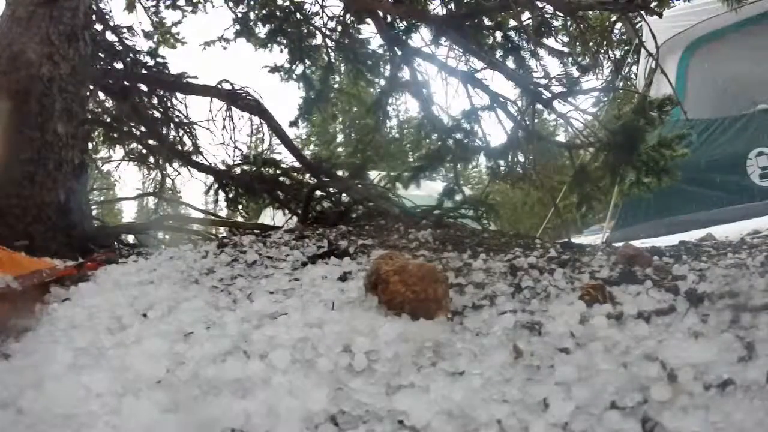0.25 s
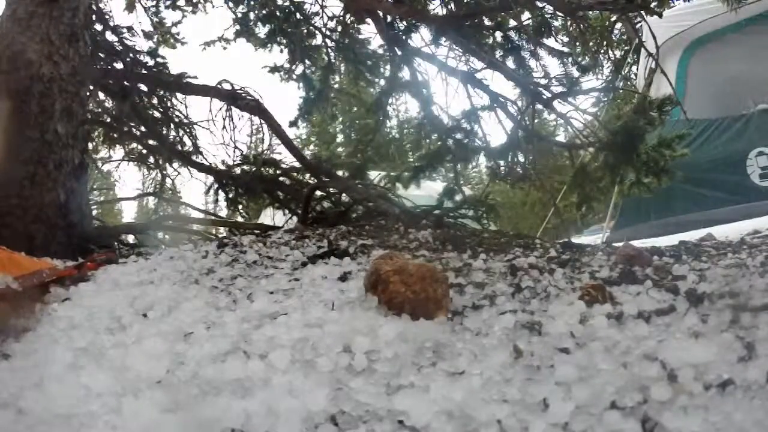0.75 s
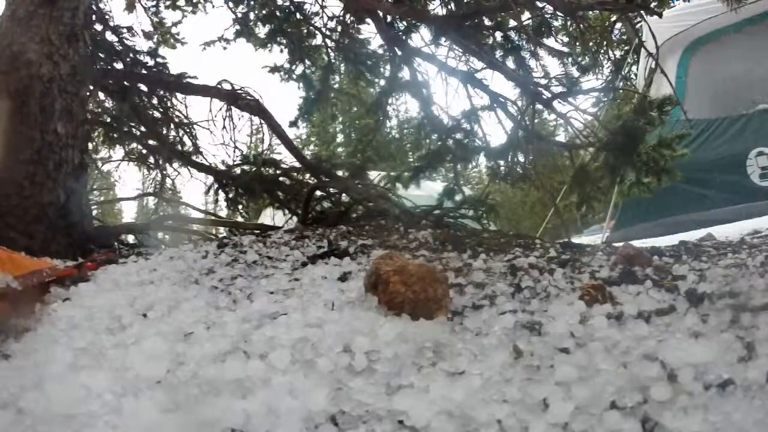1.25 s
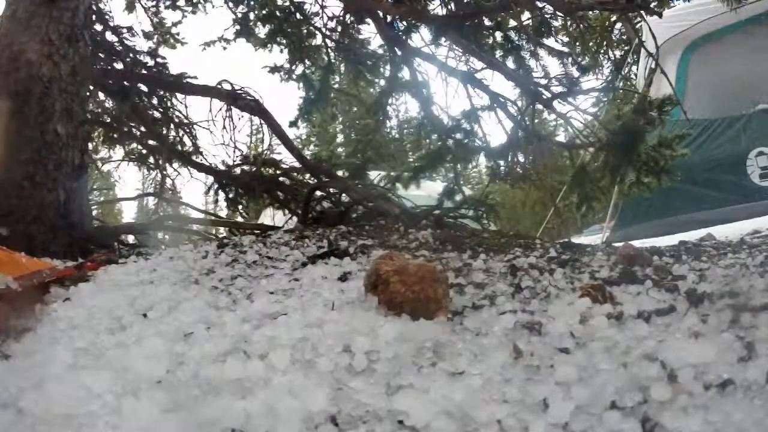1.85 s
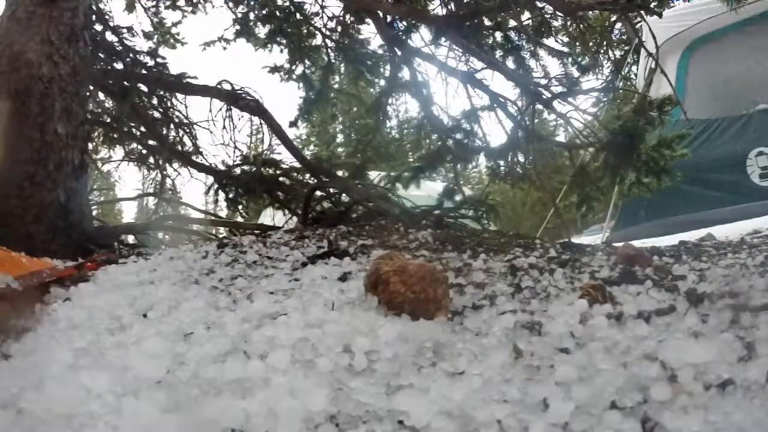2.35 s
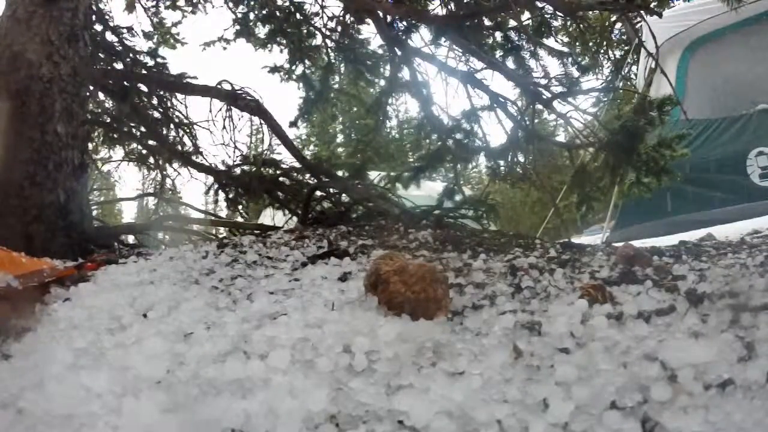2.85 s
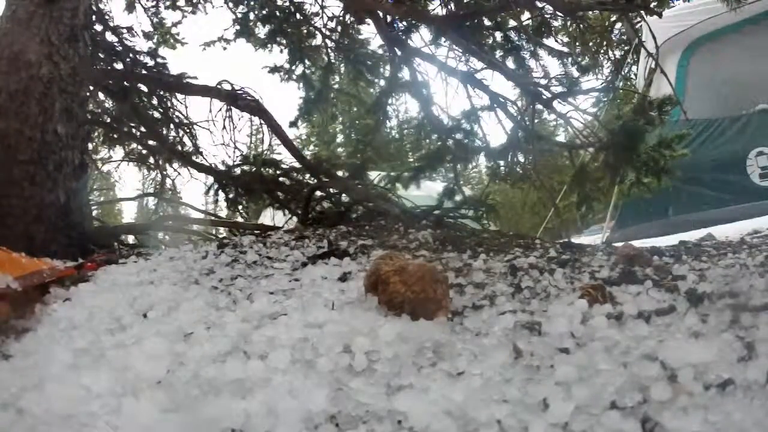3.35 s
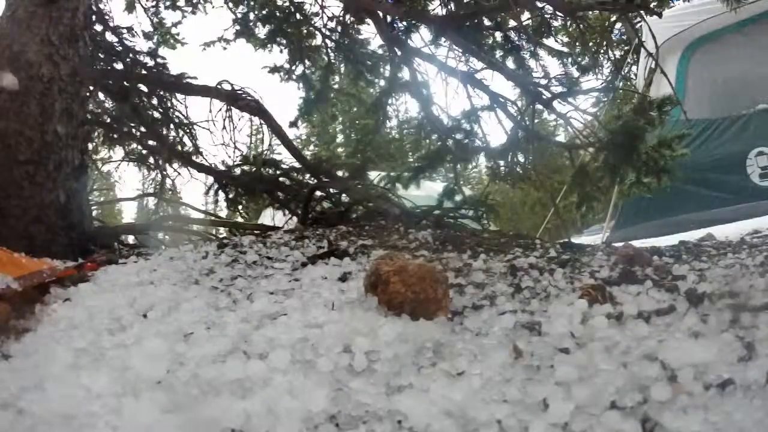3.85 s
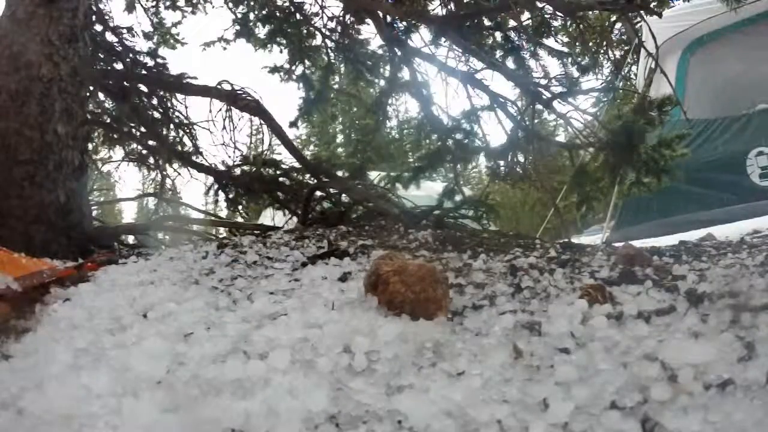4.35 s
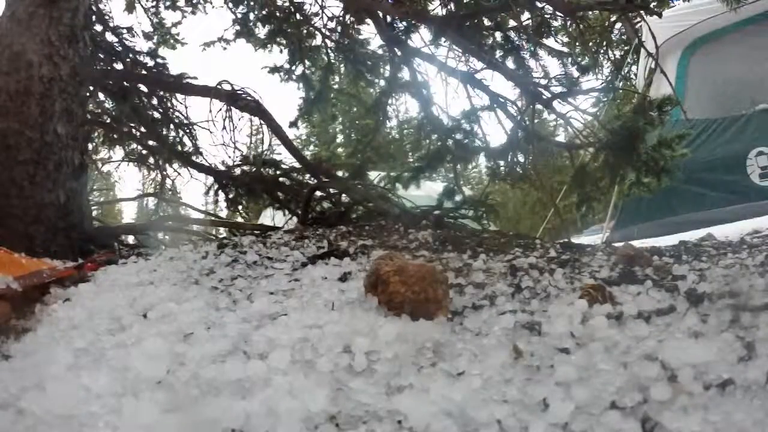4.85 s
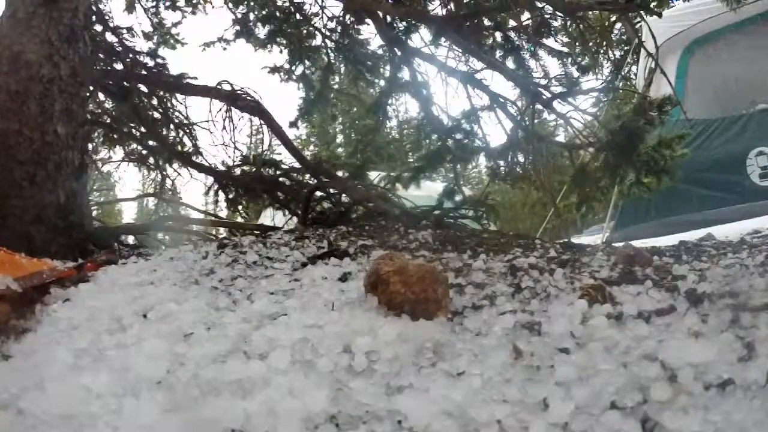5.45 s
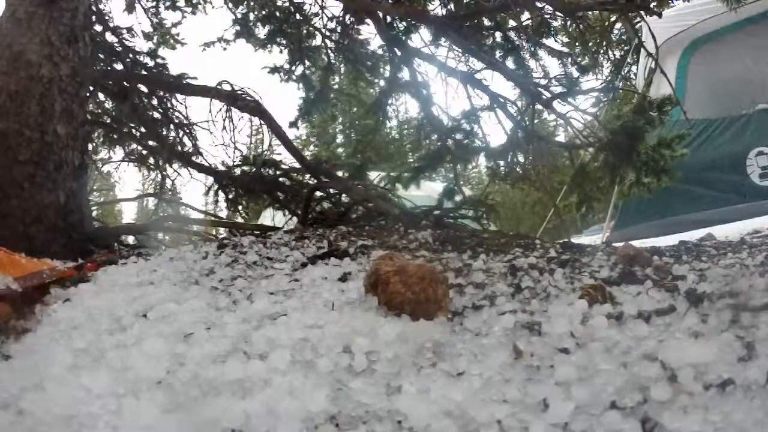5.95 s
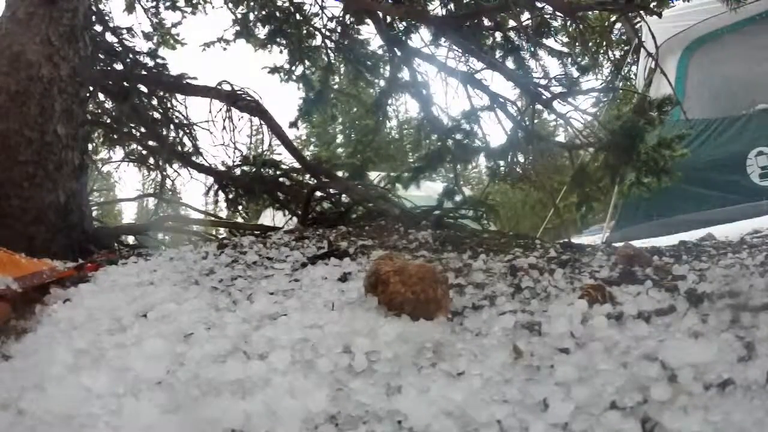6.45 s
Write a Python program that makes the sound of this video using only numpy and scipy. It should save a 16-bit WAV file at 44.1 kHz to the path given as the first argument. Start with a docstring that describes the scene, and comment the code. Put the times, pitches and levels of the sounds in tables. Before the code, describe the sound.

Hail patters steadily on a bed of hailstones outdoors, with sharp clicks and hard knocks of stones landing close by and muffled thumps on taut fabric.

```python
"""Under a spruce, next to a tent: hail falls on a carpet of hailstones; a cased camera lies on the ground.
Far stones merge into filtered noise, stones around patter as noise grains, single ones crack and settle
as filtered blows, ice chips tick, and some stones thump on taut fabric as sines of falling pitch.
The case colours wash, patter and single stones; the hardest blows make the gain control duck."""
import sys
import numpy as np
from scipy import signal
from scipy.io import wavfile
from scipy.ndimage import uniform_filter1d, minimum_filter1d

SR = 44100
rng = np.random.default_rng(int(sys.argv[2]) if len(sys.argv) > 2 else 0)


def wrap_up_sound(samples):
    """Save the sound to the file named by the first command line argument, as 16-bit audio."""
    columns = np.atleast_2d(samples).T
    # keep every value between -1 and 1, then stretch to whole-number steps
    tamed = np.clip(columns, -1, 1)
    steps = np.round(tamed * 32767).astype(np.int16)
    wavfile.write(sys.argv[1], SR, steps)


N = 295470
TIME_S = np.arange(N) / SR
WASH_RMS_DB, PATTER_RMS_DB = -55.5, -58   # ahead of the case


def from_db(db):
    """Decibels to gain."""
    return 10 ** (np.asarray(db) / 20)


def rms_one(x):
    """Scale to rms 1."""
    return x / np.sqrt(np.mean(x ** 2) + 1e-20)


def at_hz(points, hz):
    """Read a spectrum on a log-frequency axis."""
    points_hz, points_db = np.array(points).T
    return np.interp(np.log(hz), np.log(points_hz), points_db)


def band(x, low_hz, high_hz, order=2):
    """Causal band-pass."""
    edges_hz = [min(low_hz, .4 * SR), min(high_hz, .45 * SR)]
    sos = signal.butter(order, edges_hz, "band", fs=SR, output="sos")
    return signal.sosfilt(sos, x + 1e-18)


def add(track, start_s, sound):
    """Mix a short sound in at its start time."""
    at = max(0, round(start_s * SR))
    track[at:at + len(sound)] += sound[:max(0, N - at)]


def impacts(per_s, spread_db, largest):
    """Clicks of either sign at random moments: many small, few large, capped at spread_db * largest."""
    when, size, sign = rng.random((int(per_s * N / SR), 3)).T
    heights_db = spread_db * np.minimum(-np.log(1 - size), largest)
    heights = from_db(heights_db) * np.sign(sign - .5)
    return np.bincount((when * N).astype(int), heights, minlength=N)


def resonate(x, hz, width_hz, lift_db):
    """One resonance on top of the direct sound."""
    hz = min(hz, .4 * SR)
    b, a = signal.iirpeak(hz, hz / width_hz, fs=SR)
    return x + (from_db(lift_db) - 1) * signal.lfilter(b, a, x + 1e-18)


def case(x):
    """The camera case lifts a few resonances that ring briefly."""
    # resonances of the case: centre_hz, width_hz, lift_db
    resonances = [(1513, 227, 10), (2284, 316, 4), (2986, 1540, 6), (4560, 210, 1.5), (5440, 1220, 6),
                  (9660, 800, 4)]
    for hz, width_hz, lift_db in resonances:
        x = resonate(x, hz, width_hz, lift_db)
    return x


def far_wash(grain=.35):
    """Far stones merge into a hiss with a slight grain: noise plus clicks, shaped in half octaves."""
    # spectrum of the wash: pitch_hz, relative_level_db_per_hz
    spectrum = [(25, 2), (70, 6), (190, 5), (450, -1), (1100, -12.5), (1600, -12.5), (2300, -7),
                (3500, -28), (5300, -4.5), (6800, -35), (12000, -25.5), (16000, -97)]
    edges_hz = 20 * 2 ** np.arange(0, 10.1, .5)
    rain = []
    for _ in range(2):
        clicks = rms_one(impacts(1400, 4.3, largest=1.8))
        rain.append(rng.standard_normal(N) + grain * clicks)
    out = 0
    for k, (low_hz, high_hz) in enumerate(zip(edges_hz, edges_hz[1:])):
        gain = from_db(at_hz(spectrum, np.sqrt(low_hz * high_hz)))
        out = out + gain * band(rain[k % 2], low_hz, high_hz)   # neighbours use separate rain
    return rms_one(out)


def patter(per_s=1250, spread_db=4.5, crunch_s=0.001, pitches=26):
    """Stones all around: each a short crunch in loose ice, a decaying noise grain at one of many pitches."""
    # spectrum of the patter: pitch_hz, relative_grain_level_db
    spectrum = [(200, 3), (450, 8), (1000, 9), (1600, 5.5), (2300, 4), (3400, -12), (5300, 1.5),
                (7200, -12), (10000, -9), (13000, -27)]
    out, t = 0, TIME_S[:512]
    for hz in np.geomspace(200, 13000, num=pitches):
        crunch = rng.standard_normal(len(t)) * np.exp(-t / crunch_s)
        grain = rms_one(band(crunch, hz / 2.12, hz * 1.504))
        hits = impacts(per_s / pitches, spread_db, largest=2.6)
        out = out + from_db(at_hz(spectrum, hz)) * signal.oaconvolve(hits, grain)[:N]
    return rms_one(out)


def stone(level_db, knock_hz, ring_hz, crack_db, thud_db, crunch=0.11, crunch_s=0.0021, splinter=0.1,
          touches_per_s=900, scatter=0.015, scatter_s=0.0093, knock_width_hz=1200, ring_db=9):
    """A blow, a brief crunch of ice, then loose pellets settling; the struck spot rings at its own pitch."""
    t = TIME_S[:1536]
    blow, decay = t == 0, np.exp(-t / crunch_s)
    grit = rng.standard_normal((3, len(t)))
    touches = grit[2] * (rng.random(len(t)) < touches_per_s / SR)   # uneven after-touches
    settling = scatter * rms_one(touches) * np.exp(-t / scatter_s)
    force = rms_one(blow + crunch * grit[0] * decay + settling)
    fracture = rms_one(blow + splinter * grit[1] * decay + .5 * settling)

    knock = band(force, knock_hz, knock_hz + knock_width_hz)
    crack = from_db(crack_db) * band(fracture, 2500, 6570, order=1)
    thud = from_db(thud_db) * band(force, 100, 570, order=1)
    hit = case(resonate(knock + crack - thud, ring_hz, ring_hz / 5, ring_db))
    return from_db(level_db) * hit / np.sqrt(np.sum(hit ** 2) / (.003 * SR))   # energy spread over 3 ms


def spot_hz(chance, low_hz=1500, high_hz=6500):
    """The ring of a struck spot for a draw between 0 and 1, mostly low."""
    return low_hz * (high_hz / low_hz) ** (chance ** 2)


def stray_stones(count=140, faint_db=-44.5, range_db=12, lowest_hz=830, crack_db=-26,
                 crack_range_db=22, crunch=0.24):
    """Stones a few steps away sink into the loose ice with soft, mostly dull taps."""
    out = np.zeros(N)
    for when, size, pitch, spot, hard in rng.random((count, 5)):
        level_db = faint_db + range_db * size ** 3
        knock_hz = lowest_hz * 2 ** pitch
        hardness_db = crack_db + crack_range_db * hard ** 2
        tap = stone(level_db, knock_hz, spot_hz(spot), hardness_db, thud_db=-3, crunch=crunch)
        add(out, when * N / SR, tap)
    return out


def ice_chips(count=55, faint_db=-62, range_db=14, low_hz=4500, high_hz=14500, width=1.12,
              decay_s=0.00061):
    """Splinters of ice skip past the microphone: tiny dry noise ticks, each at its own high pitch."""
    out, t = np.zeros(N), TIME_S[:512]
    for when, size, pitch in rng.random((count, 3)):
        hz = low_hz * (high_hz / low_hz) ** pitch
        burst = rng.standard_normal(len(t)) * np.exp(-t / decay_s)
        tick = rms_one(band(burst, hz / width, hz * width, order=1))
        add(out, when * N / SR, from_db(faint_db + range_db * size ** 3) * tick)
    return out


def fabric_thumps(count=12, faint_db=-41.5, range_db=4.5, fabric_hz=165, decay_s=0.0027, rise_s=0.003,
                  sag=1.0, sag_s=0.0027, slap=0.41, slap_s=0.0029):
    """The surface is stretched and lets go: a short swing of falling pitch with a small slap."""
    # heavy stones on tent fabric (higher) and soft ground (lower): start_s, swing_peak_db, settled_pitch_hz
    thumps = list([(0.090, -33, 159), (1.668, -36.5, 145), (2.380, -29.5, 162), (2.490, -39, 145),
                   (2.685, -31, 155), (2.961, -28.5, 78.5), (3.465, -30.5, 147), (3.522, -31, 149),
                   (3.662, -25.5, 157), (5.111, -29.5, 155), (6.483, -26.5, 150), (6.588, -28, 73.6)])
    for when, size, pitch in rng.random((count, 3)):   # lighter stones on the tent, at random
        hz = fabric_hz * 2 ** ((pitch - .5) / 2)
        thumps.append((when * N / SR, faint_db + range_db * size, hz))

    out, t = np.zeros(N), TIME_S[:2048]
    for start_s, peak_db, hz in thumps:
        falling_hz = hz * (1 + sag * np.exp(-t / sag_s))
        phase = 2 * np.pi * np.cumsum(falling_hz) / SR
        swing = np.sin(phase) * (1 - np.exp(-t / rise_s)) * np.exp(-t / decay_s)
        touch = rms_one(band(rng.standard_normal(len(t)), 600, 1250)) * np.exp(-t / slap_s)
        add(out, start_s, from_db(peak_db) * (swing / np.abs(swing).max() + slap * touch))
    return out


def near_stones():
    """The stones that land close by, each a blow with its own knock, ring, crack and thud."""
    # blows: start_s, level_over_3_ms_db, knock_low_edge_hz, spot_ring_hz, icy_crack_db, ground_thud_db
    blows = [(0.0266, -26.5, 1700, 6840, -6, -33.0), (0.0571, -20.5, 1920, 2360, 6.5, -1),
             (0.0597, -22, 1790.0, 1800, -2, 2), (0.3046, -30, 1880, 2920, -17, 13),
             (0.35, -36, 2630.0, 10700.0, 4, 6.0), (0.4157, -28.5, 2010, 8800, -11, -16),
             (0.5918, -1, 806, 2850, -15, -19), (0.684, -32.5, 820.0, 3880, -8, -13.0),
             (0.7105, -29, 1740.0, 12700.0, 1, 4), (0.7655, -16.0, 2520.0, 6760, -3.5, -37),
             (0.808, -34.5, 1580, 4900.0, 9.0, -23.0), (0.8798, -10, 1410.0, 6400, -12.5, -30.0),
             (0.926, -26.5, 1810, 1110, -9, -4), (0.9396, -17.5, 4120, 13200, -3.5, -32),
             (0.9446, -10.5, 1890, 1840, -7.5, -5), (0.977, -29, 1220, 3300.0, -2, -25.0),
             (1.2994, -36.5, 1540, 4900.0, -43, -4), (1.4187, -39, 2000, 10760, -5, 0),
             (1.6948, -29, 1750, 4750, -12, -1.5), (1.919, -21.5, 1020, 1870, -23, -8.0),
             (2.0388, -31, 940, 4900.0, 0.5, -23.0), (2.119, -33.5, 1620.0, 7000.0, -13, -5.0),
             (2.1696, -17, 1510, 2830, -21, -42), (2.4939, -20.5, 1330.0, 2110, -36.0, -0.5),
             (2.5328, -9, 1160, 3100.0, -6, -13.5), (2.6718, -14.0, 2000, 1390, -13.0, -17.5),
             (2.8526, -15.0, 970, 720, -18, -12), (2.8592, -17.0, 2310, 1390, -13.5, -6),
             (2.9548, -36, 900, 1640, -16, -26), (2.9588, -17.5, 1020, 2920, -14, -21),
             (2.962, -20.5, 1500, 960, -12, 14.5), (3.081, -29, 1370, 5770, -24, -32.0),
             (3.1172, -37.5, 1750, 7050, -13, -28.0), (3.199, -34, 1410, 1440, -32, -5),
             (3.3147, -20.5, 1380, 10700, -7, -31), (3.55, -30.0, 2740, 1400.0, 6, 1),
             (4.0797, -32.5, 1650, 5070, -10, -19), (4.3144, -10.5, 1290, 2180, -10.0, -8),
             (4.429, -36.0, 1060, 3070, -22.0, -26.0), (4.5054, -25.0, 1290, 5600.0, -23, -27),
             (4.84, -8.5, 940, 3670, -15, -18.5), (4.8712, -22.0, 2900, 1850, 5, -34.0),
             (5.375, -28.5, 2860.0, 7000.0, -4.0, -2.0), (5.3949, -27.0, 1190.0, 600.0, -10, -35.0),
             (5.403, 2.5, 850, 1580, -14, 3.5), (5.4187, -23, 1730, 10400.0, -9, 1),
             (5.43, -22.5, 1180, 3360, -12, -17), (5.4549, -13, 1310.0, 1850, -11.5, -2),
             (5.5084, -17, 940.0, 5800, -18.0, -17), (5.602, -27.5, 2450, 11000.0, -10, -13),
             (5.8072, -31.5, 1000, 1860, -27, -13.0), (5.913, -28.5, 1450, 2950, -1.5, -35.0),
             (6.0223, -22, 1260, 1630, 7, -22), (6.5854, -19.5, 1640, 814, -12.5, -3.5),
             (6.59, -19, 1510, 3470, -14, 6), (6.6325, -17.5, 1430, 6100, -3.5, -17)]
    out = np.zeros(N)
    for start_s, *blow in blows:
        add(out, start_s, stone(*blow))
    return out


def scene():
    """A steady shower all around, with single stones, splinters and fabric thumps on top."""
    around = from_db(WASH_RMS_DB) * far_wash() + from_db(PATTER_RMS_DB) * patter()
    mix = case(around) + stray_stones() + ice_chips() + fabric_thumps() + near_stones()
    return mix[None]


def record(dry, threshold_db=-7.0, hold_s=0.2, release_db_per_s=25, cutoff_hz=15400):
    """Gain control drops at once on a hard blow, holds, and creeps back; peaks clip and the top is cut."""
    power = uniform_filter1d(dry[0] ** 2, size=132)   # 3 ms average
    over_db = np.maximum(10 * np.log10(np.maximum(power, 1e-12)) - threshold_db, 0)
    release_db = release_db_per_s * TIME_S
    duck_db = np.maximum.accumulate(over_db + release_db) - release_db
    half = int(hold_s * SR / 2)
    held = minimum_filter1d(from_db(-duck_db), size=2 * half + 1, origin=half)   # looks back only
    gain = minimum_filter1d(held, size=132)   # down just before the blow arrives
    clipped = np.clip(dry * gain, -1, 1)
    low_pass = signal.ellip(10, .1, 90, cutoff_hz, fs=SR, output="sos")
    return signal.sosfilt(low_pass, clipped)


dry = scene()
out = record(dry)
wrap_up_sound(out)
```